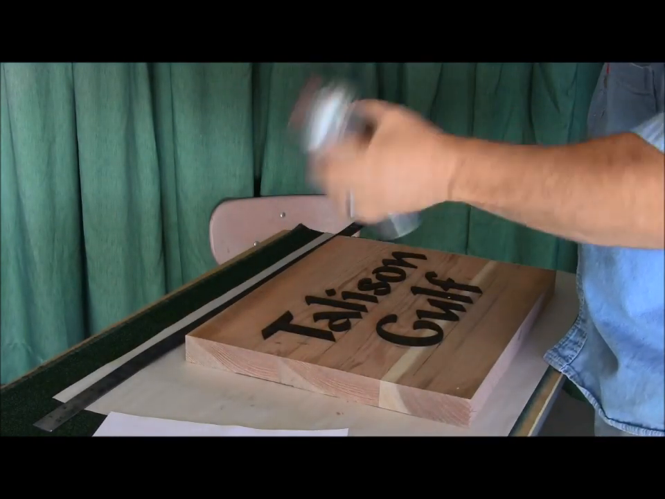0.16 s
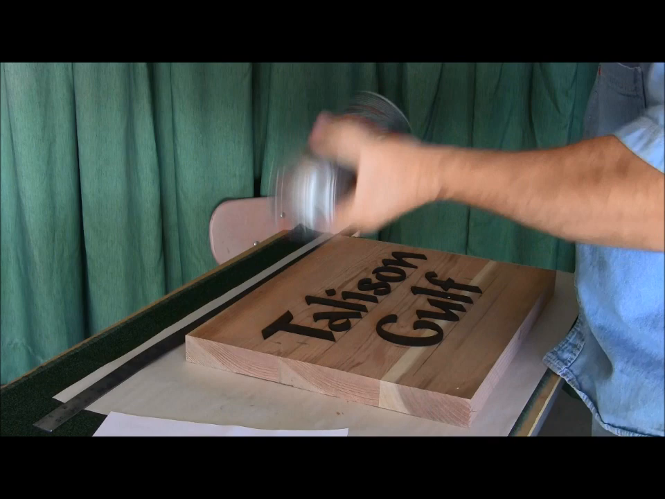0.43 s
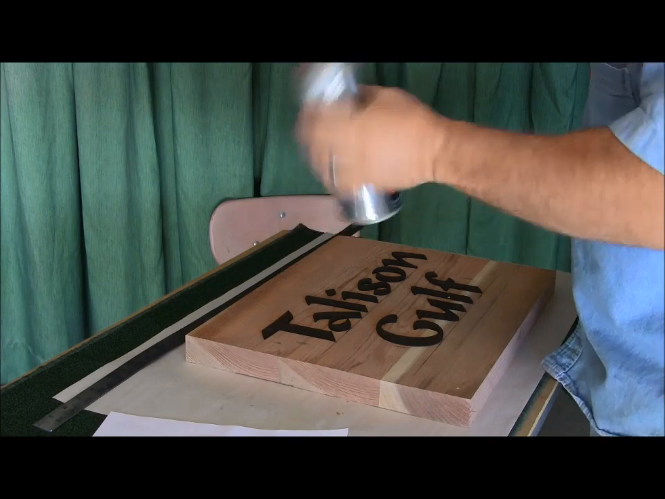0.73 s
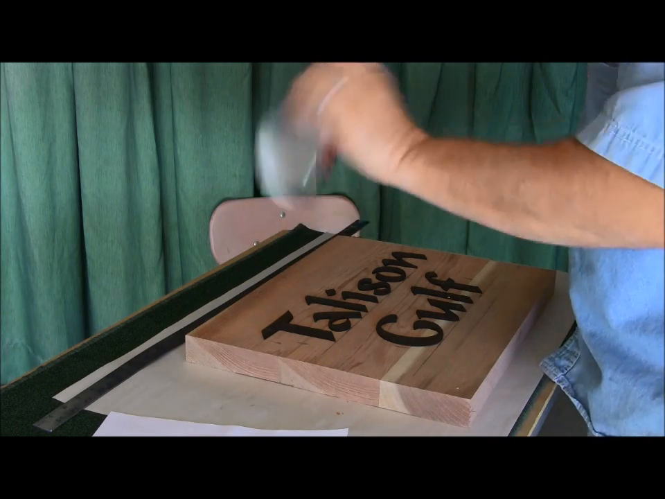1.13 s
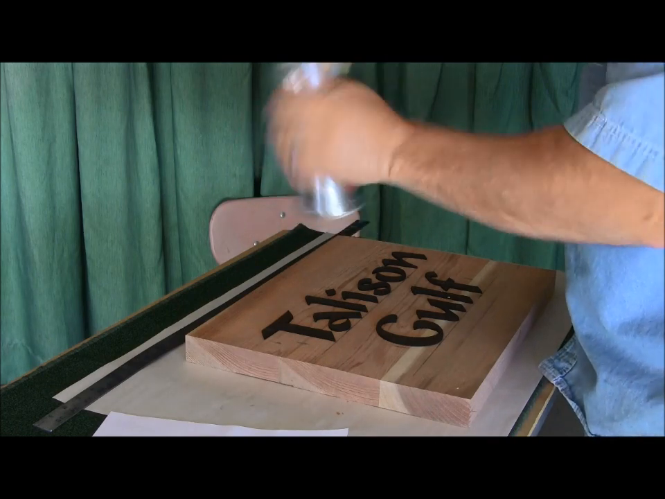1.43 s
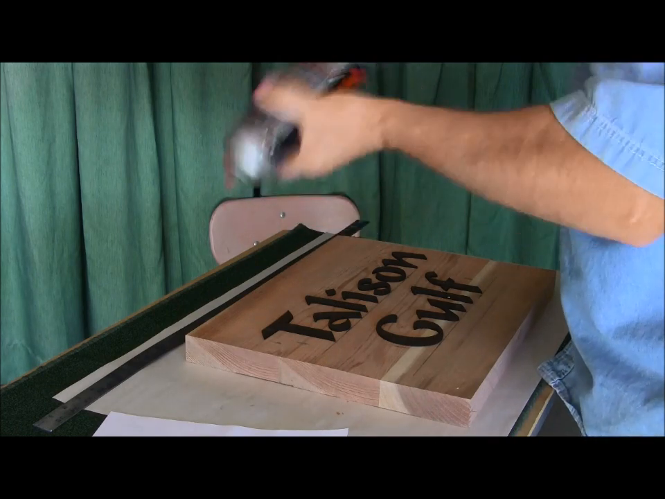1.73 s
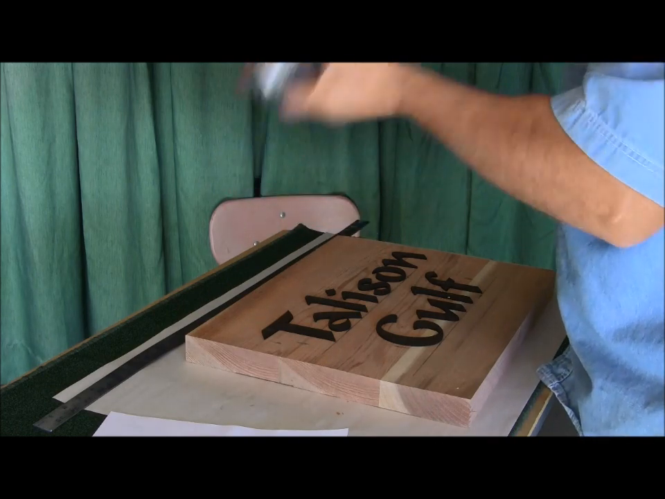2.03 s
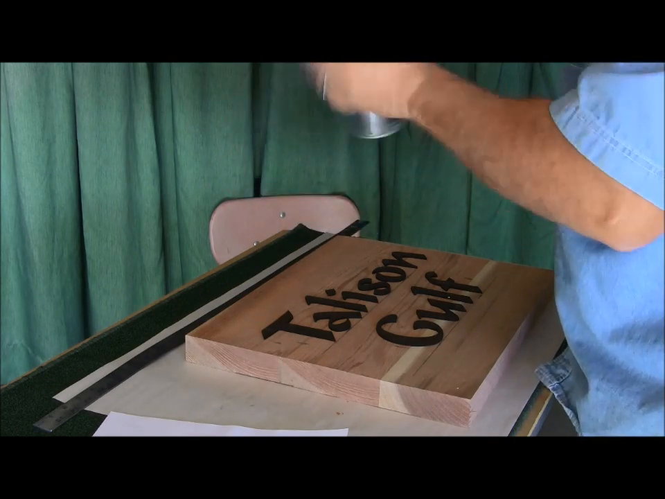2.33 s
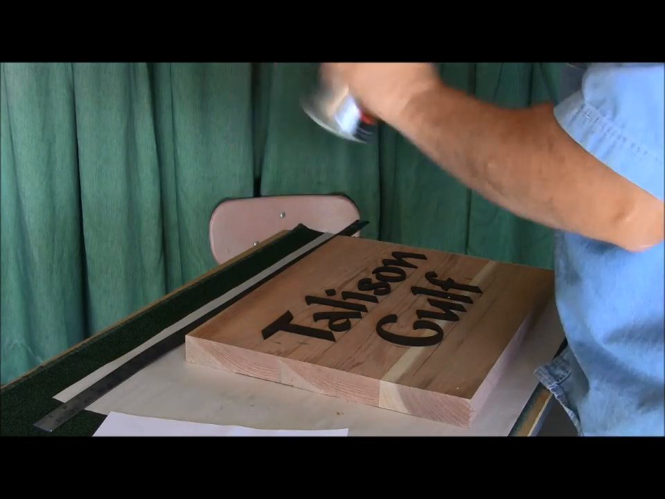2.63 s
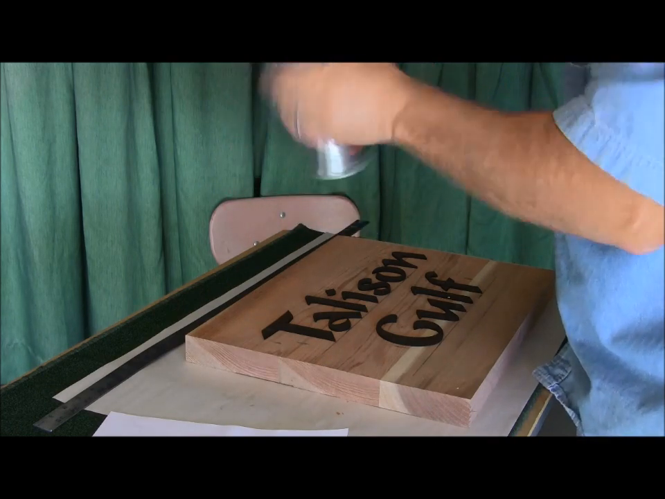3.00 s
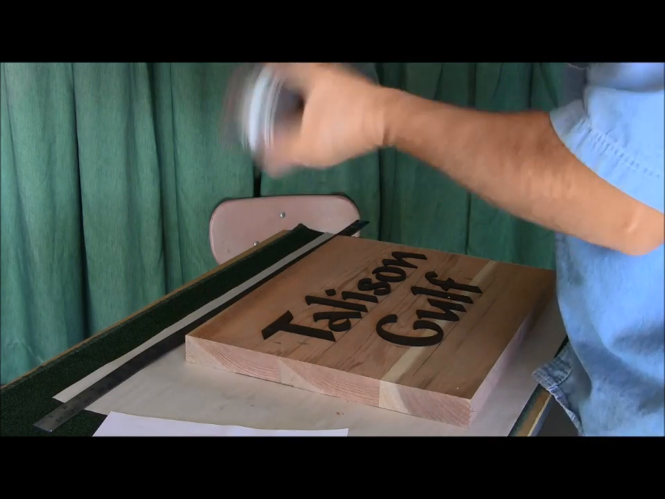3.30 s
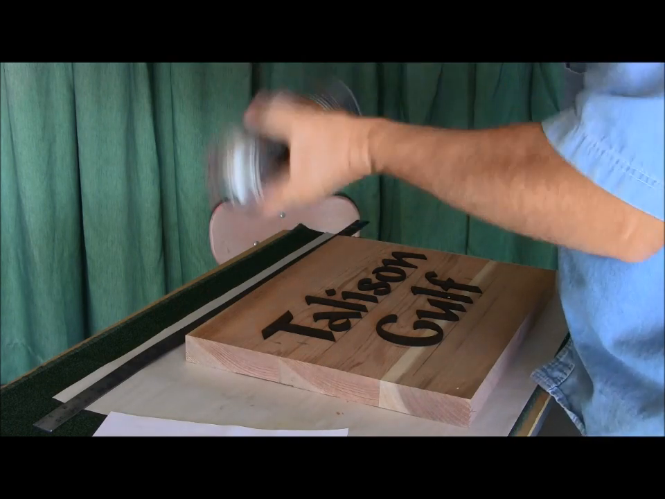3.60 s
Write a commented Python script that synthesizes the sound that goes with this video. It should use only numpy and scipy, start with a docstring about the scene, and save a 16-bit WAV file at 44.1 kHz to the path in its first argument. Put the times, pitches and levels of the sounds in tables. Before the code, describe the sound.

A spray can's mixing ball clacks rapidly inside as it is shaken close by without pause

```python
"""The mixing ball of a shaken aerosol can knocks the steel wall, about a metre away in a curtained workroom.
Each knock is a bundle of fading sines, which the paint and the grip damp at once; lesser bounces and spells
of chatter are lighter taps of the same wall. The bench and a wall send back two quick echoes, and shaped noise
makes the room's short tail and its low hush. The recorder clips the peaks."""
import sys
import numpy as np
from scipy import signal
from scipy.fft import rfft, irfft, next_fast_len
from scipy.io import wavfile

SR = 44100
rng = np.random.default_rng(int(sys.argv[2]) if len(sys.argv) > 2 else 0)


def digitize_waveform(pressure):
    """Quantize a signal to 16-bit integers and store it at the path in sys.argv[1].

    Rows of a 2-D input are taken as channels; values are limited to [-1, 1].
    """
    field = np.atleast_2d(pressure).T
    bounded = np.clip(field, -1, 1)
    quanta = np.round(bounded * 32767).astype(np.int16)
    wavfile.write(sys.argv[1], SR, quanta)


N = 165375

# ball knocks: (time [s], peak before the mix gain [dB], ring centre [Hz], treble before its lift [dB re wall])
KNOCKS = [(0.0703, -19.5, 1740, -14), (0.1179, -0.5, 3580, -5), (0.1363, 1.5, 3450, -15.5),
          (0.1828, -5.5, 3680, -28), (0.281, -3.5, 3440, -17), (0.3336, -12.5, 1860, -22),
          (0.3959, 4, 3940, -11), (0.4127, -1.5, 4380, -17), (0.4293, 1.5, 3670, -11),
          (0.4834, -12, 3860, -4), (0.4898, -4.5, 4030, -36), (0.5747, -4.5, 3520, -15),
          (0.6355, -7.0, 3100, -12), (0.6453, 0, 3520, -8.5), (0.6482, -4.5, 3480, -15),
          (0.6703, -4, 3610, -19), (0.681, -1.5, 4400, -32), (0.6965, 0, 3560, -23),
          (0.7319, 1, 4840, -15.5), (0.7592, -1, 3340, -26), (0.8483, -3.5, 3400, -20),
          (0.9148, -16.0, 1620, -21), (0.9561, 3, 3940, -14), (0.9677, -5, 4530, -12),
          (0.9887, -1.5, 3520, -12), (0.9932, -4, 2380, -35), (1.0787, 1, 3890, -15),
          (1.1029, -3.5, 4050, -15), (1.1169, -0.5, 3370, -27), (1.1647, 1, 3290, -7.5),
          (1.1916, -1.5, 4530, -12), (1.2759, -5.5, 3400, -10), (1.324, -1.5, 3200, -14.5),
          (1.3285, 0.5, 3900, -20), (1.3912, -0.5, 3300, -18), (1.4109, -9, 1640, -20),
          (1.442, -1.5, 2700, -6), (1.4544, 0, 3420, -9), (1.5036, -1.5, 3700, -19), (1.5403, 0, 4150, -17),
          (1.5644, -5, 2690, -11.5), (1.6153, 2, 3710, -14), (1.6308, -6.5, 3570, -17),
          (1.6691, -6.5, 2100, -28), (1.7163, 0, 2300, -26), (1.7298, 0.5, 4090, -4),
          (1.7542, -11.5, 3600, -24), (1.8128, -1.5, 3920, -7.5), (1.8519, -4.5, 3650, -32),
          (1.8845, -3.5, 3310, -13), (1.8893, -12, 4170, -46), (1.9098, -1, 4580, -26),
          (1.9137, -9, 3350, -15), (1.9223, -2, 3270, -20), (1.9588, -4, 2440, -5), (1.9781, -7, 2440, 1),
          (1.9886, -2.5, 4577, -4), (2.0181, -4.5, 3530, -34), (2.0568, -3, 4120, -3),
          (2.1029, -9, 4200, -35), (2.1348, -6.5, 3870, -26), (2.1478, -9.5, 3350, -26),
          (2.1776, -3.5, 4140, -17.5), (2.2211, -1, 3595, -16), (2.2334, -6.5, 3540, -3.5),
          (2.2782, -2.5, 3200, -12), (2.3317, 1.5, 4130, -18), (2.435, -2.0, 3490, -25),
          (2.5007, -7, 3640, -3), (2.5108, -3.5, 2230, 2), (2.5237, -6, 3350, -16),
          (2.5327, -2.5, 3300, -27), (2.5377, -8, 3430, -30), (2.5775, -5, 4850, -7),
          (2.6011, -4, 3480, -35), (2.6334, -4, 3280, -22), (2.6479, 0, 4090, -17), (2.6949, 0, 3570, -20),
          (2.7576, -5, 3500, -13.5), (2.7809, -3.5, 3330, -8), (2.7967, 0, 3760, -15),
          (2.8103, -3, 3446, -21), (2.8478, 2.5, 3620, -11.5), (2.8746, -8, 4880, -14),
          (2.9312, 2.5, 3960, -17), (2.94, -12.5, 2470, -3), (2.9544, -10, 3400, -27),
          (2.9656, -6, 3500, -26), (3.0279, -8, 1930, -23), (3.0593, 2, 3870, -7.5),
          (3.078, 1.5, 3520, -16), (3.1223, -14, 1940, -30), (3.1816, -0.5, 3480, -6),
          (3.2163, 1, 3270, -12), (3.2255, -6.5, 3420, -21), (3.2656, -1, 3180, -17),
          (3.2849, -0.5, 3720, -10.5), (3.3391, 1.5, 3230, -15), (3.3701, -1, 4416, -13.5),
          (3.3986, -3, 3870, -34), (3.4266, 0, 3700, -13.5), (3.4443, -1.5, 4100, -38),
          (3.4474, -1.5, 4270, -24), (3.4959, 0, 3786, -16), (3.5427, -8.5, 2250, -25),
          (3.5685, -12.5, 1900, -20), (3.5784, 0, 3500, -20), (3.6171, 0.5, 3560, -13),
          (3.6285, -8, 3550, -22), (3.6732, 1, 3830, -4), (3.6959, -6, 4694, -18)]
# a knock just before the start, of which only the tail is heard; same columns
EARLIER_KNOCK = (-.012, -4, 3300, -16)
# rings of the can wall before detuning: (frequency [Hz])
CAN_RINGS = [1122, 1552, 2120, 2265, 2830, 3126, 4065, 4863, 5350, 6490, 6860]
# treble rings, before detuning and scatter: (frequency [Hz], relative level [dB], 60 dB decay [s])
RIM_RINGS = [(7960, -2, 0.0058), (9750, 0.5, 0.0075), (11480, -0.5, 0.0032), (12240, -8.5, 0.0057),
             (14000, -9.5, 0.0007)]
# spells of the ball chattering along the wall: (start [s], length [s], tap level before scatter and gain [dB])
CHATTER = [(0.138, .11, -15.5), (.399, 0.079, -13.5), (0.493, .05, -13.5), (.64, .05, -16.5),
           (.74, .08, -15), (1.2, .05, -12), (1.276, .03, -13.5), (1.724, .04, -6.5), (1.959, .07, -14),
           (2.229, .07, -10.5), (2.334, 0.074, -21), (2.503, .05, -10), (2.754, .11, -12),
           (3.285, .05, -21), (3.579, .07, -10)]
# early echoes off the bench and a wall: (delay [s], level [dB])
ECHOES = [(.0049, -14.5), (.0073, -17.5)]
# decay of the room tail: (frequency [Hz], 60 dB decay [s])
ROOM_T60 = [(500, 0.57), (12000, 0.15)]
# width of the room tail: (frequency [Hz], side against mid [dB])
ROOM_SIDE = [(300, -20), (1500, -20), (5000, -6.5)]
# colour of the hush before its treble roll-off: (frequency [Hz], relative level [dB])
HUSH_COLOUR = [(25, -9), (250, -2), (700, 5)]

LEAD = 4096  # samples of run-in before the start
CONTACT_S = .00015  # time constant of the attack
FOCUS_HZ = 756  # spread of the can rings that a knock favours
SKIRT_DB, ROOM_SKIRT_DB = -12, -12.5  # floor under that favour: heard directly, and by the room
CAN_T60_S, CAN_DB = 0.056, 4.5  # can rings: decay, level against the struck patch
RIM_DB = 1  # lift of the treble rings: they are briefer, so they peak higher
RING_SCATTER_DB, DETUNE = 3.5, .08  # random change of each ring from knock to knock [dB, share]
PATCH_S, TAP_S = .0018, .0011  # closing time of the wall sound: full knock, light or distant tap
KNOCK_SIDE_DB = -27  # typical lean of a knock to one side

BOUNCES, BOUNCE_GAP_S = 5, 0.0079  # skips after each knock, typical gap
BOUNCE_DB, BOUNCE_FADE_DB_S = -16.5, -110  # level against the knock, fade per second
TAP_SCATTER_DB = 3.5
CHATTER_GAP_S, CHATTER_HZ, CHATTER_TREBLE_DB = .003, 3580, -17.5  # typical gap, centre, treble before its lift

ROOM_DB, ROOM_START_S = -8.5, 0.0026  # energy of the tail, time over which it swells
POSES, POSE_S = 9, .06  # the moving can meets the room from a new place this often
HUSH_DB, HUSH_SIDE_DB = -54, -6  # RMS of the mid, side against mid
LOW_CUT_HZ, GAIN_DB = 442, 0.5
CEILING, TOP_HZ = .95, 16300  # clip level (1 is full scale), upper band edge


def undb(db):
    """Turns decibels into amplitude."""
    return 10 ** (np.asarray(db) / 20)


def on_log(hz, table):
    """Reads a (frequency [Hz], value) table on a log-frequency axis."""
    table = np.array(table)
    return np.interp(np.log(hz), np.log(table[:, 0]), table[:, 1])


def ring(hz, db, t60, phase, t):
    """Sums exponentially fading sines, one row per knock."""
    fade = undb(db[..., None] - 60 * t / t60[:, None])
    wave = np.sin(2 * np.pi * hz[..., None] * t + phase[..., None])
    return np.sum(fade * wave, axis=1)


def unit(x):
    """Scales each row to peak 1."""
    return x / np.abs(x).max(axis=1, keepdims=True)


def knocks(rows, skirt_db=SKIRT_DB, patch=1, close_s=PATCH_S):
    """Each knock rings its patch of wall and favours nearby can rings until the paint closes; gives mid, side."""
    time, peak_db, centre, treble_db = rows.T
    can_rings = [(hz, 0, CAN_T60_S) for hz in CAN_RINGS]
    rim_rings = [tuple(row) for row in RIM_RINGS]
    modes = np.array(sorted(can_rings * 2 + rim_rings * 2))  # every ring is a detuned pair
    chance = rng.standard_normal((len(rows), 3, len(modes)))
    t = np.arange(512) / SR
    hz = modes[:, 0] * (1 + DETUNE * chance[:, 0])
    level_db = modes[:, 1] + RING_SCATTER_DB * chance[:, 1]
    phase = np.pi * chance[:, 2]
    near = np.exp(-.5 * ((hz - centre[:, None]) / FOCUS_HZ) ** 2)
    favour_db = 20 * np.log10(near + undb(skirt_db))

    # sorted by frequency, the can rings come first and the rim rings last
    split = 2 * len(can_rings)
    low, high = slice(0, split), slice(split, None)
    can_db = level_db[:, low] + favour_db[:, low]
    can = unit(ring(hz[:, low], can_db, modes[low, 2], phase[:, low], t))
    rim = unit(ring(hz[:, high], level_db[:, high], modes[high, 2], phase[:, high], t))
    struck_patch = patch * np.sin(2 * np.pi * centre[:, None] * t)
    wall = (struck_patch + undb(CAN_DB) * can) * np.exp(-(t / close_s) ** 2)
    treble = rim * undb(treble_db + RIM_DB)[:, None]
    attack = 1 - np.exp(-t / CONTACT_S)
    hits = unit((unit(wall) + treble) * attack) * undb(peak_db)[:, None]

    out = np.zeros((2, N + LEAD + len(t)))
    starts = (time * SR).astype(int) + LEAD
    for at, hit, lean in zip(starts, hits, chance[:, 1, -1]):
        if at < N + LEAD:
            out[:, at:at + len(t)] += hit * np.array([[1], [lean * undb(KNOCK_SIDE_DB)]])
    return out[:, :N + LEAD]


def bounces(rows):
    """Lists the ball's skips after each knock, which tend to weaken and stray a little in colour."""
    chance = rng.standard_normal((len(rows), BOUNCES, 3))
    late = np.cumsum(BOUNCE_GAP_S * np.exp(.5 * chance[..., 0]), axis=1)
    fade_db = BOUNCE_DB + BOUNCE_FADE_DB_S * late
    peak_db = rows[:, 1:2] + fade_db + TAP_SCATTER_DB * chance[..., 1]
    centre = rows[:, 2:3] * np.exp(.1 * chance[..., 2])
    treble_db = rows[:, 3:] + 0 * late  # the knock's own treble
    skips = np.stack([rows[:, :1] + late, peak_db, centre, treble_db], axis=-1)
    return skips.reshape(-1, rows.shape[1])


def room(x):
    """Two early echoes, then a noisy tail whose treble dies first and whose grain changes as the can moves."""
    t = np.arange(SR // 2) / SR
    tail = np.zeros((POSES, 2, len(t)))
    for hz in 250 * np.sqrt(2) ** np.arange(13):  # half-octave bands
        edges = [hz / 2 ** .25, min(hz * 2 ** .25, .49 * SR)]
        band = signal.butter(2, edges, "band", fs=SR, output="sos")
        noise = signal.sosfilt(band, rng.standard_normal(tail.shape))
        width_db = np.array([[0], [on_log(hz, ROOM_SIDE)]])
        tail += noise * undb(-60 * t / on_log(hz, ROOM_T60) + width_db)
    tail *= 1 - np.exp(-(t / ROOM_START_S) ** 2)
    tail *= undb(ROOM_DB) / np.sqrt(np.sum(tail[:, 0] ** 2) / POSES)
    for late, db in ECHOES:
        tail[:, 0, int(late * SR)] += undb(db)

    # crossfade the sound through the poses in a cycle, each with its own tail
    pose = np.arange(len(x)) / SR / POSE_S % POSES
    size = next_fast_len(len(x) + len(t))
    spectrum = 0
    for k in range(POSES):
        distance = np.abs((pose - k + 1) % POSES - 1)
        share = np.sqrt(np.clip(1 - distance, 0, 1))
        spectrum = spectrum + rfft(x * share, size) * rfft(tail[k], size)
    return irfft(spectrum, size)[:, :len(x)]


def hush():
    """Low steady room noise, shaped in frequency; gives mid and side."""
    hz = np.arange(N // 2 + 1) * SR / N + 1  # 1 Hz up, to keep the logarithm finite
    colour = undb(on_log(hz, HUSH_COLOUR)) / (1 + (hz / 800) ** 2)
    noise = irfft(rfft(rng.standard_normal((2, N))) * colour, N)
    return noise / noise[0].std() * undb([[HUSH_DB], [HUSH_DB + HUSH_SIDE_DB]])


def chatter():
    """Lists uneven light taps of varied colour, as the ball chatters along the wall for each spell."""
    start, length, db = np.array(CHATTER).T[..., None]
    chance = rng.standard_normal((len(CHATTER), 40, 4))  # at most 40 taps a spell
    late = np.cumsum(CHATTER_GAP_S * np.exp(.5 * chance[..., 0]), axis=1)
    peak_db = db + TAP_SCATTER_DB * chance[..., 1]
    centre = CHATTER_HZ * np.exp(.15 * chance[..., 2])
    treble_db = CHATTER_TREBLE_DB + TAP_SCATTER_DB * chance[..., 3]
    taps = np.stack([start + late, peak_db, centre, treble_db], axis=-1)
    return taps[late < length]


def scene():
    """Mixes the can, its room and the hush into left and right."""
    rows = np.array([EARLIER_KNOCK] + list(KNOCKS), float)
    direct = knocks(rows)
    # the room hears the can from other sides, so each knock reaches it with another colour
    to_room = knocks(rows, ROOM_SKIRT_DB, patch=0, close_s=TAP_S)
    light_rows = np.concatenate([bounces(rows), chatter()])
    taps = knocks(light_rows, patch=0, close_s=TAP_S)
    can = direct + taps + room(to_room[0] + taps[0])
    low_cut = signal.butter(2, LOW_CUT_HZ, "high", fs=SR, output="sos")
    can = signal.sosfilt(low_cut, can)  # a small can gives little bass
    mid, side = can[:, LEAD:] * undb(GAIN_DB) + hush()
    return np.array([mid + side, mid - side])


def record(dry):
    """The recorder clips the loudest peaks flat, then a steep low-pass cuts the top."""
    clipped = np.clip(dry, -CEILING, CEILING)
    top_cut = signal.ellip(10, .2, 90, TOP_HZ, fs=SR, output="sos")  # ripple and stopband in dB
    return signal.sosfilt(top_cut, clipped)


dry = scene()
out = record(dry)
digitize_waveform(out)
```